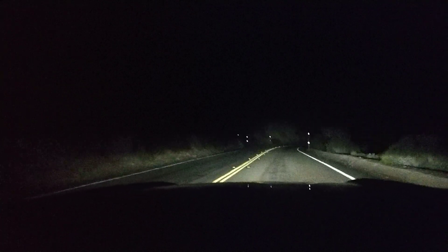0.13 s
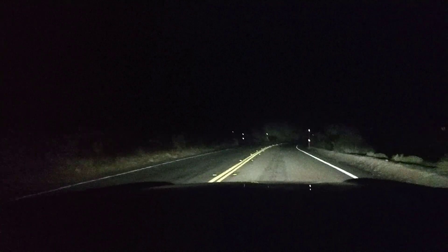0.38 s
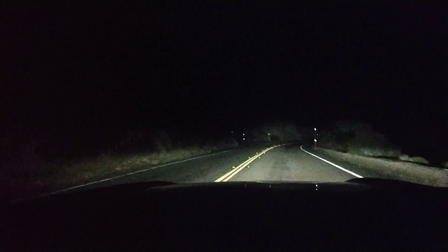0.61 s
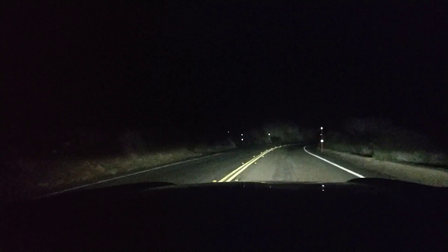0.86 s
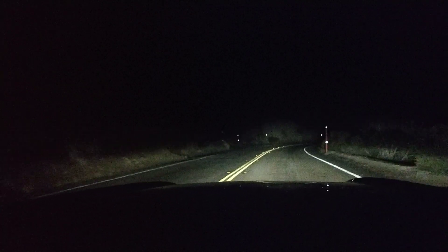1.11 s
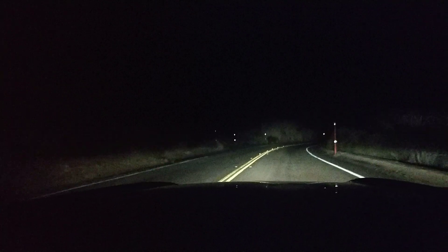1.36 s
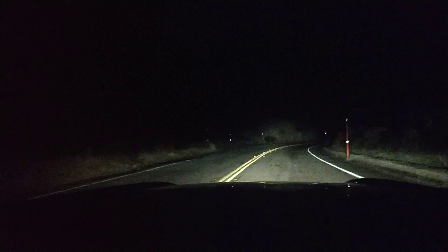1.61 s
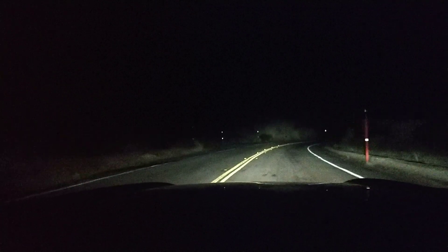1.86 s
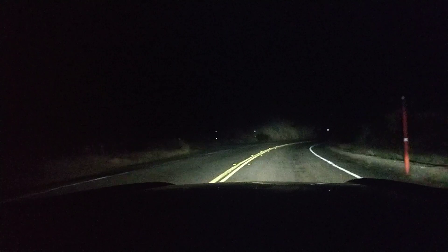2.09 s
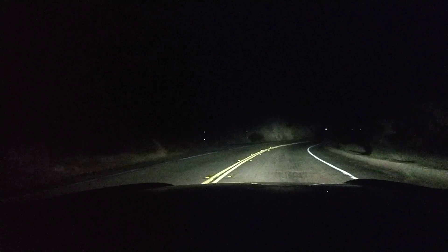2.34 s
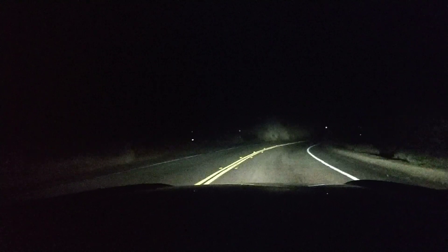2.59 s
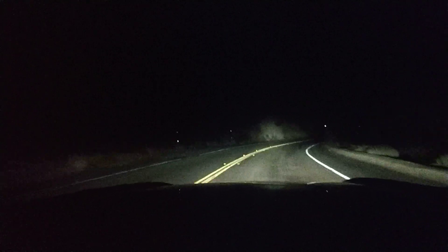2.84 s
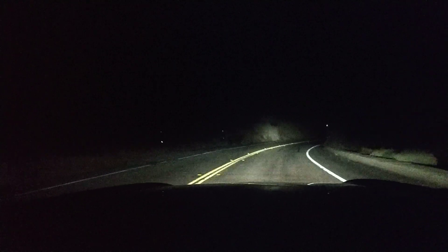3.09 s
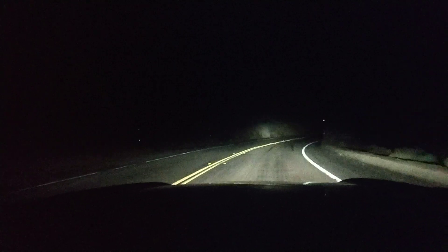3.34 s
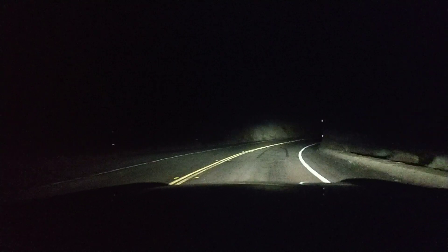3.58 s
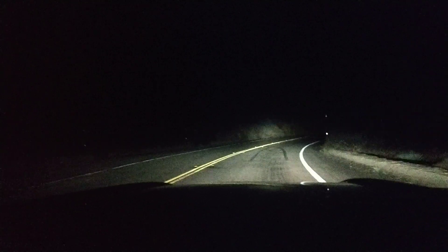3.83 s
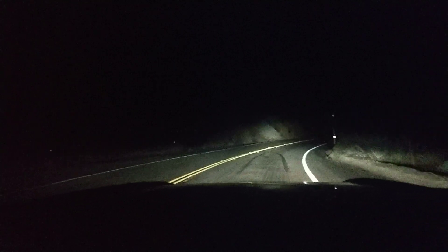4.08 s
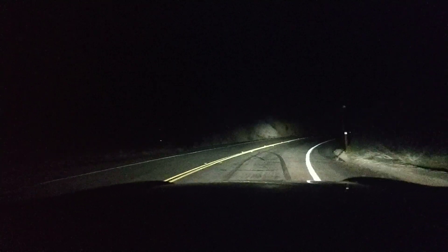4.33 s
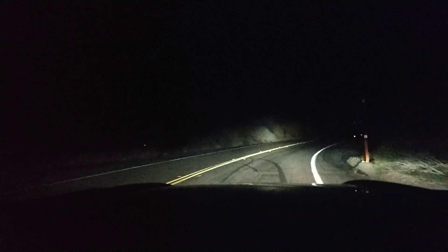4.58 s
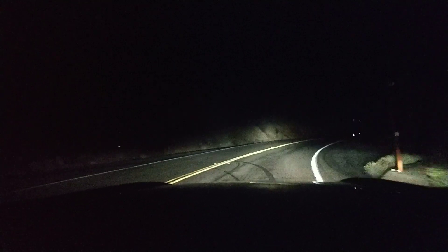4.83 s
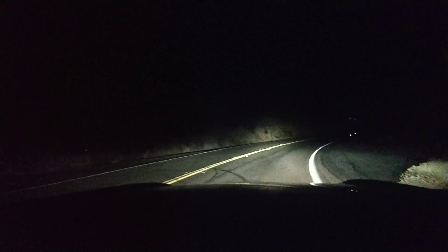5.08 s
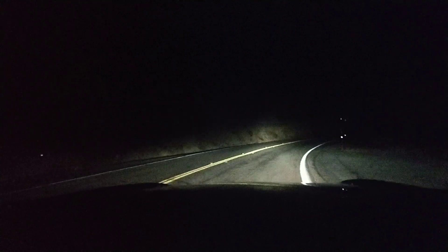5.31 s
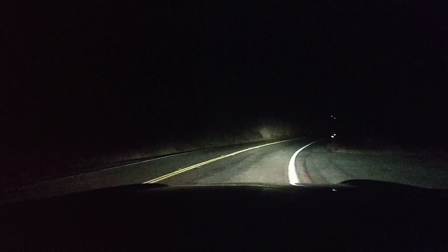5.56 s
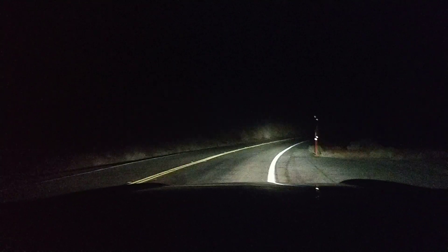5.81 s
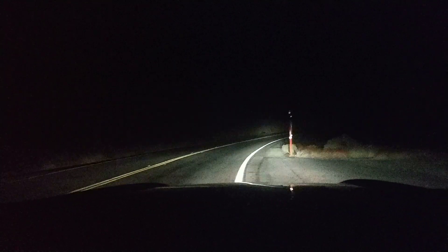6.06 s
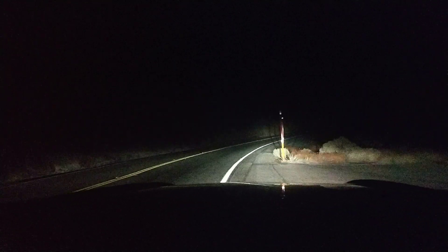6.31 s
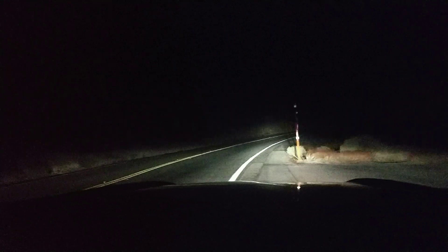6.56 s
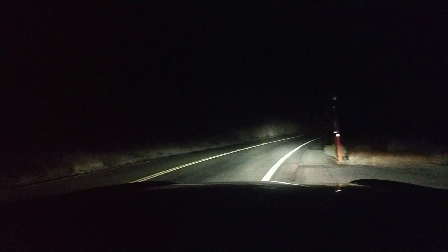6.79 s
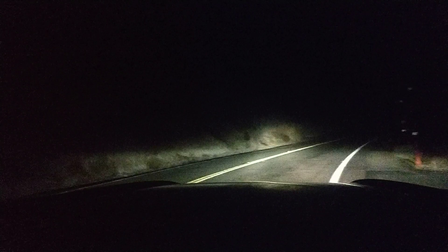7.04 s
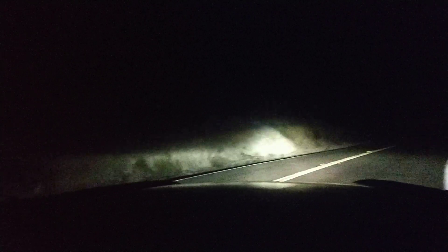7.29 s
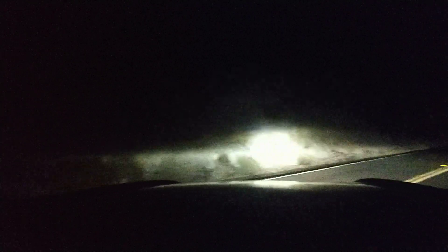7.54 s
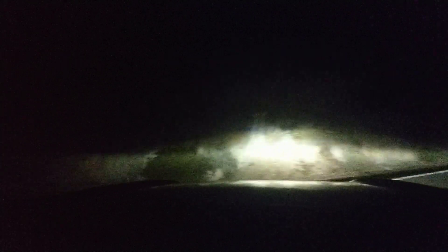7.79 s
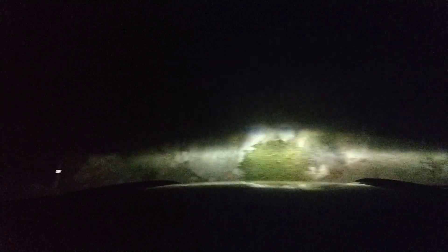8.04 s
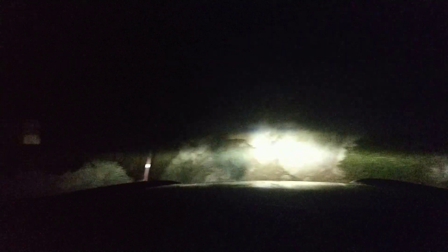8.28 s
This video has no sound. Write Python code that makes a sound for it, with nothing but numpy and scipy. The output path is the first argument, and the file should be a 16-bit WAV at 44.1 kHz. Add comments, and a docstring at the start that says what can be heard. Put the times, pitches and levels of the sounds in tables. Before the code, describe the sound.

A stereo microphone in the cabin hears a rough, bassy engine accelerating over road rumble and wind. It lifts off, dips, jumps in pitch on a downshift with a very faint brake squeal, then coasts steadily lower and quieter. Hands click and slide on the wheel, a low thud knocks, and the engine blips up again, settling into a ragged, boomy hum.

```python
"""An engine drones inside a moving car: it pulls, slows, and its speed leaps twice as it changes down.
The drone is a stack of sines at multiples of the engine cycle; intake and wind are coloured noise.
Thuds are short low tones; hands tick and slide on wheel and trim as noise bursts; a brake squeals faintly.
Noise for road rumble, boom, drumming and roar lies beneath. Two microphone ports feed a limiter."""
import sys
import numpy as np
from scipy import signal
from scipy.fft import rfft, irfft, next_fast_len
from scipy.io import wavfile
from scipy.ndimage import uniform_filter1d

SR = 44100
rng = np.random.default_rng(int(sys.argv[2]) if len(sys.argv) > 2 else 0)


def invert_db(level):
    """Linear amplitude ratio for a level in decibels (20 dB per decade), elementwise."""
    return 10 ** (np.asarray(level, dtype=float) / 20)


def file_out(sig):
    """Save sig as 16-bit WAV at sys.argv[1]."""
    # one column per channel
    cols = np.atleast_2d(sig).T
    # limit, then scale
    lim = np.clip(cols, -1, 1)
    pcm = np.round(lim * 32767).astype(np.int16)
    wavfile.write(sys.argv[1], SR, pcm)


N = 370864
TIME_S = np.arange(N) / SR
LONG = next_fast_len(N)
BIN_HZ = np.maximum(np.arange(LONG // 2 + 1) * SR / LONG, 1)

# Overall engine drone: t/s, level/dB
DRONE = [(0, -20.5), (.35, -25.5), (0.851, -19), (1.75, -22.5), (2.13, -25.5), (2.3, -29), (2.903, -28),
         (3.401, -25.5), (3.6, -23.5), (4.26, -19), (5, -22), (5.602, -24), (6.4, -26.5), (7.2, -29.5),
         (7.64, -35.5), (7.75, -29), (8.0, -36.5), (8.41, -29.5)]
# Engine cycle rate, half the crank speed: t/s, f/Hz
CYCLE = [(0, 24.8), (.3, 24.7), (.75, 25.7), (1.5, 28.2), (2.07, 28.1), (3.18, 18.4), (3.33, 20.2),
         (3.66, 25.8), (3.93, 31.8), (4.01, 31.6), (4.19, 29.9), (4.4, 30.1), (4.7, 29.2), (5.06, 27.2),
         (5.52, 23.9), (6.51, 16.1), (7.2, 13.8), (7.38, 11.3), (7.54, 11), (7.63, 21.5), (7.75, 22.5),
         (8.41, 20.5)]
# Throttle: t/s, opening (0-1)
THROTTLE = [(0, 1), (1.7, 1), (2.3, 0), (8.41, 0)]
# Multiples 1, 2, 3 .. of the cycle rate; uneven cylinders feed the odd ones under load:
# pulling level/dB, coasting level/dB
ORDERS = [(-11, -16), (-1, 4), (-9, -3), (-9, 0), (1, -7), (-2, 1), (4, -3), (3, -.5), (-2, -5.5), (-1, -2),
          (-5, -10.5), (-15, -4), (-8, -9.5), (-8.5, -9), (1, -11), (0, -2.5), (-6, -17), (1.5, -12),
          (2.5, -12), (-7, -15), (-4.5, -10), (-7, -16), (-2.5, -17), (-7, -15), (-7, -17)]
# Every higher multiple: pulling level/dB, coasting level/dB
UPPER_ORDERS = (-9.5, -26.5)
# Boom of the fourth multiple, late in the slowing and after the second leap: t/s, extra level/dB
FOURTH_BOOM = [(6.1, 0), (6.55, 16), (7.1, 17), (7.3, 19), (7.52, 22), (7.55, 6), (7.62, 10), (7.65, 24),
               (7.9, 21), (8.41, 18)]
# Narrow body resonances that pass the engine: f/Hz, level/dB
BODY = [(40, 4), (70, 3), (100, -3), (145, 1.5), (165, 10), (190, -1), (240, -9), (265, .5), (290, 3),
        (315, 3.5), (340, 0), (370, 1.5), (395, 8), (418, 1), (442, .5), (465, 2), (497, -9), (520, -3),
        (560, -11), (610, -3), (660, -6), (840, -12), (1100, -28)]
# Unsteady firing, even under load, ragged around gear changes and near idle: t/s, factor
RAGGED = [(0, 1), (.5, .4), (1.8, .4), (3.1, .7), (3.9, .4), (5.8, .4), (7.2, 1.2), (8.41, 4.5)]
# Brief dips shared by engine, intake, drumming, roar and hiss: t/s, depth/dB, half width to 1/e/s
DIPS = [(0.299, 4, 0.032), (.54, 4.5, 0.044), (0.768, 6.5, 0.03), (1.802, 5, 0.028), (2.028, 5.5, 0.019),
        (3.351, 3.5, 0.046), (4.342, 5.5, 0.067), (4.767, 5, 0.035), (5.75, 4.5, 0.03), (6.94, 1.5, 0.046),
        (7.52, 5.5, 0.12)]
# Colour of the air drawn past the throttle: f/Hz, relative level/dB
INTAKE = [(1800, -12.5), (2600, -4), (4700, -2.5), (5600, -6.5), (6200, -46.5)]
# Low thuds through the floor: t/s, envelope peak level/dB, f/Hz
THUDS = [(7.173, -6.5, 95.5), (7.636, -24, 80.4), (7.759, -16.5, 99)]
# Ticks of wheel and trim: t/s, level/dB, left minus right level/dB, brightness (0-1)
TICKS = [(5.0776, -35, 11, 0.13), (5.97, -37.5, -5, 0.6), (6.326, -38.5, -0.5, 0.6), (6.355, -30, 3, 0),
         (6.539, -30.5, -3.5, 0.6), (6.552, -33.5, -6, 0.8), (6.694, -34, -11, 0.4),
         (6.714, -27.5, -4, 0.06), (6.8297, -19.5, -6.5, 0.42), (6.842, -37.5, 1, 0.4),
         (6.868, -31.5, -2.5, 0.1), (6.946, -44, -11.5, 1), (7.026, -45, -5, 0.9), (7.1214, -35, 1.5, 0.5),
         (7.3, -36.5, -4.5, 0.9), (7.319, -29, 2.5, 0.3), (7.6762, -33, 4.5, 1), (7.691, -36.5, 0, 1),
         (7.7198, -40, -1, 1)]
# Strokes of hands and cloth: start t/s, loudest t/s, end t/s, level/dB
STROKES = [(1.468, 1.754, 2.2, -49), (4.138, 4.267, 4.72, -52.5), (4.353, 4.68, 4.63, -48),
           (4.803, 5.559, 5.7, -55.5), (5.345, 5.358, 5.72, -49), (6.148, 6.396, 7.45, -53),
           (7.33, 7.43, 7.48, -52), (7.663, 7.686, 7.7, -49), (7.829, 7.982, 8.13, -39.5),
           (8.194, 8.254, 8.28, -44.5)]
# Colour of the strokes and of bright ticks: f/Hz, relative level/dB
SKIN = [(1290, -53), (2200, -16.5), (2410, -14), (4200, -9), (5100, -3.5), (5800, -10), (7840, -7.5),
        (9010, -17.5), (11200, -10.5), (14300, -8), (15800, -9)]
# Tyres and air: t/s, tyre roar level/dB, wind hiss level/dB
ROAD = [(0, -14, -41.5), (.45, -16.5, -44.5), (.85, -10.5, -41), (1.3, -12.5, -35.5), (1.7, -12.5, -40.5),
        (1.82, -16, -40.5), (2.25, -21.5, -43.5), (4.5, -19.5, -48), (5.4, -24, -50), (6.1, -26.5, -54),
        (7.2, -29, -53.5), (8.0, -31, -54), (8.41, -29, -50.5)]
# Slow wander of the bass: t/s, rumble level/dB, boom level/dB
BASS_LEVEL = [(0, -20, -15.5), (1.4, -9.5, -18), (1.65, -14.5, -15), (2.15, -8, -17.5), (2.7, -13.5, -19),
              (4.5, -18.5, -15.5), (5.85, -19.5, -17), (6.15, -16, -14), (7.2, -32.5, -19.5),
              (7.38, -16, -18), (8.41, -16.5, -17.5)]
# Tyres drumming through the floor: t/s, level/dB
DRUMMING = [(0, -16), (.5, -18), (.9, -25), (1.5, -23), (1.8, -17), (2.5, -27), (3.3, -23.5), (4.7, -24),
            (5.0, -27.5), (5.8, -28), (6.1, -24), (7.2, -30.5), (8.41, -32)]
# Colour of the suspension: f/Hz, relative level/dB
RUMBLE = [(5.9, -33), (10, -3.5), (38, 2), (60, -9.5), (78, -21), (130, -120)]
# Colour of floor pan and cabin air: f/Hz, relative level/dB
BOOM = [(24, -25), (40, -1.5), (60, -4.5), (108, -10), (140, -17), (180, -28), (310, -120)]
# Colour of the drumming: f/Hz, relative level/dB
DRUM = [(70, -40.5), (110, -9), (190, -11), (240, -8), (420, -11), (490, -10), (580, -40)]
# Colour of the tyre tread: f/Hz, relative level/dB
ROAR = [(430, -38.5), (510, -6.5), (600, -7), (1000, -10.5), (1400, -18), (1900, -20), (2600, -57)]
# Colour of wind on the glass: f/Hz, relative level/dB
HISS = [(710, -13.5), (1200, -0.5), (1570, 1.5), (2270, -9), (5010, -12.5), (5960, -17.5), (7790, -17),
        (9000, -32), (11500, -23.5), (14000, -47)]
# Cabin air and panel modes: f/Hz, width/Hz, level/dB
CABIN = [(54.1, 30, -11.5), (91, 36, -8), (177, 110, 2.5), (288, 94, -1.5), (360, 42, -5.5), (475, 41, -15),
         (634, 44, -17.5), (820, 220, -23)]
# The two ports: f/Hz, likeness (0-1), right leads/rad, left minus right level/dB
PORTS = [(20, .995, 0, 1.2), (60, .99, 0, .8), (100, .93, 0, .3), (140, .98, .08, .4), (260, .93, .2, 2),
         (400, .88, .7, 5), (600, .3, 1.6, 0), (1050, .75, 3.1, -2), (1600, .68, 2.9, -2),
         (2400, .15, 6, 0), (5000, .05, 9, -6), (9000, .05, 9, -5), (15000, .05, 9, 8)]
# Where the treble is 40 dB down: left f/Hz, right f/Hz
TREBLE_END = (16000, 14500)

INTAKE_DB = -7                                 # against the wind hiss
THUD_RISE_S = 0.012
STROKE_CURVE = 0.7                             # power law of swell and fade
RUSTLE_DB, RUSTLE_TOP_HZ = -62, 13500
SQUEAL_START_S, SQUEAL_END_S, SQUEAL_EDGE_S = 3.39, 3.63, 0.03
SQUEAL_START_HZ, SQUEAL_SAG_HZ_PER_S, SQUEAL_DB = 2040, 270, -54.5
NULL_HZ, NULL_WIDTH_HZ, NULL_DEPTH = 550, 60, 0.6   # the ports sit near a node of one mode
LIMIT_DB, SQUEEZE = -7, 0.35                   # squeeze: share of the overshoot that is ducked
OVERSHOOT_FALL_DB_PER_S = 30                   # fall of the held overshoot, before the squeeze


def rms_one(x):
    """Scale to unit rms."""
    return x / np.sqrt(np.mean(x ** 2) + 1e-20)


def in_time(rows):
    """Draw each column of a timed table as a curve, one value per sample."""
    t, *columns = np.transpose(rows)
    return [np.interp(TIME_S, t, column) for column in columns]


def at_hz(points, hz, axis=1):
    """Read a table column on a log-frequency axis."""
    return np.interp(np.log(hz), np.log(np.array(points)[:, 0]), np.array(points)[:, axis])


def drift(rate_hz, size=1):
    """Random wander of unit rms at every size-th sample: white noise through two equal low-pass poles."""
    pole = np.exp(-2 * np.pi * rate_hz * 64 / SR)      # made at one 64th of the sample rate
    white = rng.standard_normal(N // 64 + 2002)
    slow = signal.lfilter([1], [1, -2 * pole, pole * pole], white)[2000:]
    return np.interp(np.arange(0, N, size) / 64, np.arange(len(slow)), rms_one(slow))


def noise(colour, level_db, flicker_db, rate_hz):
    """Two unrelated draws of coloured noise under one flickering level."""
    white = rng.standard_normal((2, LONG))
    coloured = irfft(rfft(white) * invert_db(at_hz(colour, BIN_HZ)), LONG)[:, :N]
    return rms_one(coloured) * invert_db(level_db + flicker_db * drift(rate_hz))


def dips_db():
    """Sum the bell-shaped dips of the level."""
    return -sum(depth_db * np.exp(-((TIME_S - t) / width_s) ** 2) for t, depth_db, width_s in DIPS)


def engine():
    """Wavering sines at multiples of the firing cycle, twice with other phases; high ones waver more."""
    step = 16                                          # made at a low rate, then resampled
    curves = (CYCLE, DRONE, THROTTLE, FOURTH_BOOM, RAGGED)
    cycle_hz, drone_db, opening, fourth_db, ragged = (in_time(rows)[0][::step] for rows in curves)
    cycle_phase = 2 * np.pi * np.cumsum(cycle_hz) * step / SR
    orders = 0
    for k in range(1, 41):
        pull_db, coast_db = ORDERS[k - 1] if k <= len(ORDERS) else UPPER_ORDERS
        level_db = coast_db + opening * (pull_db - coast_db) + at_hz(BODY, k * cycle_hz)
        if k == 4:
            level_db = level_db + fourth_db
        level_db = level_db + 1.5 * drift(3, size=step)
        waver = (0.08 + 0.0015 * k * k) * ragged * drift(5, size=step)
        start_phase = rng.uniform(0, 2 * np.pi, (2, 1))
        orders = orders + invert_db(level_db) * np.sin(k * cycle_phase + waver + start_phase)
    drone = orders * invert_db(drone_db + dips_db()[::step])
    return signal.resample_poly(drone, step, 1, axis=1)[:, :N]


def intake():
    """A noisy rush of air while the throttle is open, swelling with the wind."""
    opening = in_time(THROTTLE)[0]
    hiss_db = in_time(ROAD)[1] + dips_db()
    return opening * noise(INTAKE, hiss_db + INTAKE_DB, flicker_db=3.5, rate_hz=18)


def thuds():
    """Each thud is a low tone that swells and dies within a few cycles."""
    out = np.zeros(N)
    age = TIME_S[:SR // 4]
    envelope = age / THUD_RISE_S * np.exp(1 - age / THUD_RISE_S)
    for t, peak_db, hz in THUDS:
        out[round(t * SR):][:len(age)] += invert_db(peak_db) * envelope * np.sin(2 * np.pi * hz * age)
    return out


def ticks():
    """Noise cracks with short tails blend a ringing plastic body with a snap coloured like the sliding."""
    out = np.zeros((2, N))
    age = np.arange(4000) / SR
    decay = np.exp(-age / 0.0055) + 0.37 * np.exp(-age / 0.02)
    plastic = signal.butter(2, [1200, 3000], "band", fs=SR, output="sos")
    hz = np.maximum(np.arange(2001) * SR / 4000, 1)
    colour = invert_db(at_hz(SKIN, hz))
    for t, level_db, pan_db, brightness in TICKS:
        burst = rng.standard_normal((2, len(age)))
        share = np.clip(brightness, 0, 1)
        treble = np.where(hz > 9000, share, 1.0)       # duller ticks lose their top
        body = 0.74 * (1 - share) * signal.sosfilt(plastic, burst)
        snap = 2.2 * share * irfft(rfft(burst) * colour * treble)
        port_db = level_db + np.array([[0.5], [-0.5]]) * pan_db
        out[:, round(t * SR):][:, :len(age)] += (body + snap) * decay * invert_db(port_db)
    return out


def sliding():
    """Skin on leather: bright friction noise swells and fades per stroke, over a faint, duller rustle."""
    swell = 0
    for start_s, loudest_s, end_s, db in STROKES:
        stroke = np.interp(TIME_S, [start_s, loudest_s, end_s], [0, 1, 0])
        swell = swell + invert_db(db) * stroke ** STROKE_CURVE
    friction = noise(SKIN, 0, flicker_db=1.5, rate_hz=40)
    low_pass = signal.butter(8, RUSTLE_TOP_HZ, fs=SR, output="sos")
    rustle = signal.sosfilt(low_pass, friction)
    return swell * friction + invert_db(RUSTLE_DB) * rustle


def squeal():
    """A faint falling brake tone, unsteady in pitch and level as the pad sticks and slips."""
    sagging_hz = SQUEAL_START_HZ - SQUEAL_SAG_HZ_PER_S * (TIME_S - SQUEAL_START_S)
    to_edge_s = np.minimum(TIME_S - SQUEAL_START_S, SQUEAL_END_S - TIME_S)
    gate = np.clip(to_edge_s / SQUEAL_EDGE_S, 0, 1)
    level = invert_db(SQUEAL_DB + 3 * drift(30))
    phase = 2 * np.pi * np.cumsum(sagging_hz + 16 * drift(40)) / SR
    return gate * level * np.sin(phase)


def cabin(x):
    """Parallel modes whose skirts cancel in between and leave dark valleys, with a notch at a node."""
    modes = sum(invert_db(db) / (1 + 2j * (BIN_HZ - hz) / width_hz) for hz, width_hz, db in CABIN)
    node = 1 - NULL_DEPTH / (1 + 2j * (BIN_HZ - NULL_HZ) / NULL_WIDTH_HZ)
    return irfft(rfft(x, LONG) * modes * node, LONG)[:, :N]


def road():
    """Coloured noises: drumming and roar ring the cabin modes; rumble, boom and wind hiss join directly."""
    rumble_db, boom_db = in_time(BASS_LEVEL)
    roar_db, hiss_db = in_time(ROAD) + dips_db()
    drumming_db = in_time(DRUMMING)[0] + dips_db()
    drumming = noise(DRUM, drumming_db, flicker_db=2, rate_hz=5)
    roar = noise(ROAR, roar_db, flicker_db=1.2, rate_hz=7.6)
    rumble = noise(RUMBLE, rumble_db, flicker_db=0.5, rate_hz=0.7)
    boom = noise(BOOM, boom_db, flicker_db=3, rate_hz=3.8)
    hiss = noise(HISS, hiss_db, flicker_db=1.52, rate_hz=25)
    return rumble + boom + cabin(drumming + roar) + hiss


def ports(x, other):
    """The right port hears x shifted in phase, mixed with an unrelated share; each has its own balance."""
    alike = np.clip(at_hz(PORTS, BIN_HZ), 0, 1)
    lead = np.exp(1j * at_hz(PORTS, BIN_HZ, axis=2))
    lean = invert_db(at_hz(PORTS, BIN_HZ, axis=3) / 2)
    left = rfft(x, LONG)
    right = alike * left * lead + np.sqrt(1 - alike ** 2) * rfft(other, LONG)
    return irfft(np.array([left * lean, right / lean]), LONG)[:, :N]


def scene():
    """Engine and diffuse sound pass the ports; thuds and squeal sit centred, ticks have their own pan."""
    diffuse = engine() + road() + intake() + sliding()
    return ports(*diffuse) + thuds() + ticks() + squeal()


def top_cut(x):
    """Nothing passes above the cut-off."""
    return signal.sosfilt(signal.butter(12, 15850, fs=SR, output="sos"), x)


def record(dry):
    """Each port's treble ends; a limiter ducks both ports on peaks and recovers at a steady rate."""
    low_passes = [signal.cheby2(10, 40, hz, fs=SR, output="sos") for hz in TREBLE_END]
    heard = np.array([signal.sosfilt(sos, x) for sos, x in zip(low_passes, dry)])
    peak_db = 20 * np.log10(np.abs(heard).max(axis=0) + 1e-9)
    over_db = np.maximum(peak_db - LIMIT_DB, 0)
    ramp_db = OVERSHOOT_FALL_DB_PER_S * TIME_S
    held_db = np.maximum.accumulate(over_db + ramp_db) - ramp_db
    smooth_db = uniform_filter1d(held_db, size=200)
    limited = heard * invert_db(-SQUEEZE * smooth_db)
    rounded = limited / (1 + (limited / 0.9) ** 4) ** 0.25     # the last peaks are rounded
    return top_cut(rounded)


dry = scene()
out = record(dry)
file_out(out)
```